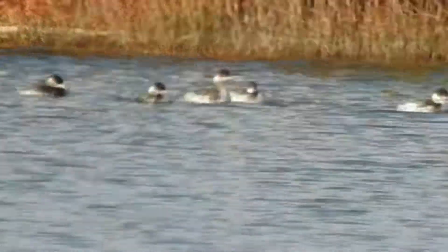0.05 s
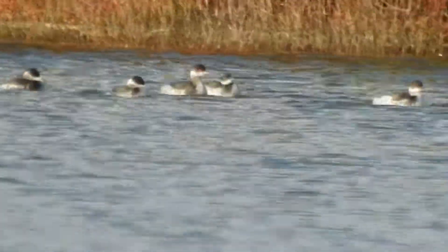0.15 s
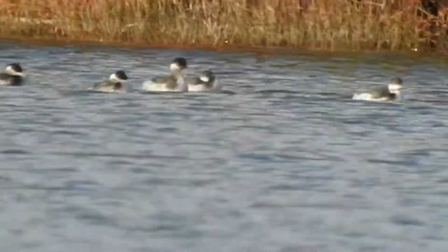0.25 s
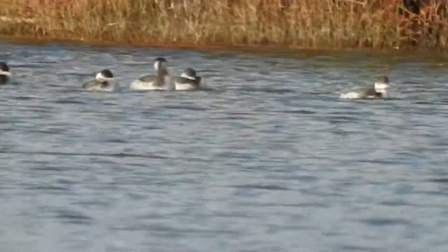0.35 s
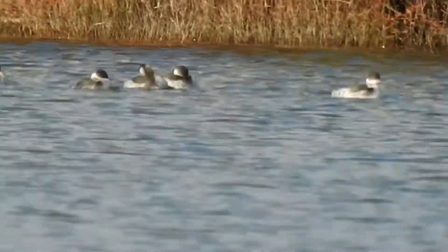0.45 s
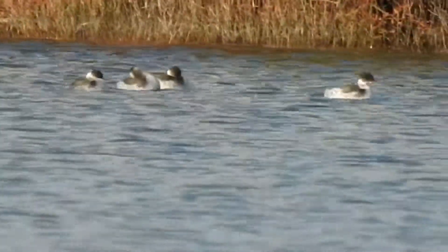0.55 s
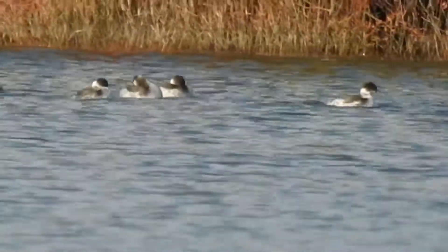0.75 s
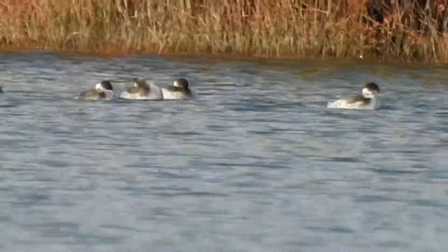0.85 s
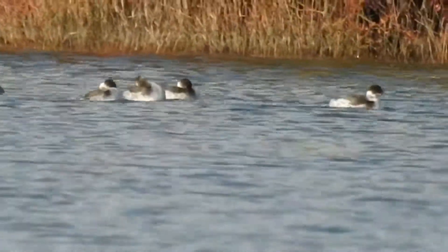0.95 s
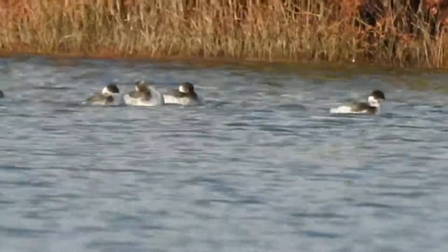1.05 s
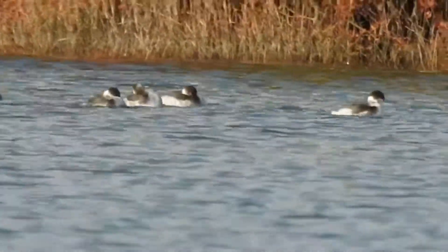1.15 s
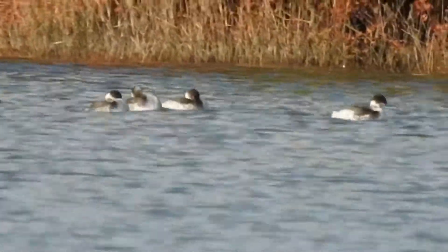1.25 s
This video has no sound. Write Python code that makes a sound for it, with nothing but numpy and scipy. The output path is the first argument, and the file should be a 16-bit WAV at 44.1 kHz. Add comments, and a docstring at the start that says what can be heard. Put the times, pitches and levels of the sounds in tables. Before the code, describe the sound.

Close to a stereo microphone, water birds give three clear whistles with a slight echo, the middle one loudest and highest. Distant peeps and chips come next, while the pond washes and bubbles quietly under a steady hiss.

```python
"""Water birds on a reedy pond

Close to a stereo microphone pair, birds whistle a warbled note, a loud high rising note with a fast
quiver, and a stepped note; the reeds and banks answer. Farther out come faint whistles, peeps and sharp
upward chips. Bubbles trickle at the water's edge and two drops plop, over low rumble, water wash and
hiss. The loudest crests overload the input and crackle faintly."""
import sys
import numpy as np
from scipy import signal
from scipy.fft import rfft, irfft, next_fast_len
from scipy.io import wavfile
from scipy.ndimage import uniform_filter1d, map_coordinates

SR = 44100
rng = np.random.default_rng(int(sys.argv[2]) if len(sys.argv) > 2 else 0)


def transcribe(u):
    """Save the signal u as a 16-bit wav file named by the first command-line argument.

    u: samples, shape (n,) or (channels, n), limited to [-1, 1]; the rate is SR.
    q: integer samples, one column per channel.
    """
    v = np.clip(np.atleast_2d(u).T, -1, 1)
    q = np.round(v * 32767).astype(np.int16)
    wavfile.write(sys.argv[1], SR, q)


N = 57330
T = np.arange(N) / SR


def amp(db):
    return 10 ** (np.asarray(db) / 20)


def unit(x):
    return x / np.sqrt(np.mean(x ** 2) + 1e-20)


def level(rows):
    """Gain per sample from rows of seconds and dB."""
    return amp(np.interp(T, *np.transpose(rows)))


def wobble(rate_hz):
    """A smooth random curve through rate_hz points a second."""
    return map_coordinates(rng.standard_normal(int(N * rate_hz / SR) + 4), [T * rate_hz])


def filtered(x, response):
    """x shaped by a response that is a function of Hz."""
    size = next_fast_len(N + 8192)
    return irfft(rfft(x, size) * response(np.fft.rfftfreq(size, 1 / SR)), size)[..., :N]


def noise_pair(length, alike):
    """White noise at the two microphones, with correlation alike."""
    common, apart = rng.standard_normal((2, length))
    angle = np.arccos(np.clip(alike, 0, 1)) / 2
    mid, side = np.cos(angle) * common, np.sin(angle) * apart
    return np.array([mid + side, mid - side])


def rush(spectrum, alike):
    """Stereo noise of rms 1, coloured by rows of Hz and dB."""
    hz, db = np.transpose(spectrum)
    colour = lambda f: amp(np.interp(np.log(f + 1), np.log(hz + 1), db))
    return unit(filtered(noise_pair(N, alike), colour))


def track(rows):
    """Smoothed pitch and gain per sample from rows of seconds, Hz and dB; silent outside them."""
    times, hz, db = np.transpose(rows)
    gain = amp(np.interp(T, times, db)) * (T >= times[0]) * (T <= times[-1])
    return uniform_filter1d(np.interp(T, times, hz), size=60), uniform_filter1d(gain, size=40)


def tone(hz, gain, order=1):
    """One partial of a whistle, gain as rms."""
    return np.sqrt(2) * gain * np.sin(2 * np.pi * order * np.cumsum(hz) / SR)


def placed(x, pan_db, lag_s):
    """The right microphone hears x louder by pan_db and sooner by lag_s than the left."""
    side = np.array([[-.5], [.5]])
    return filtered(x, lambda f: amp(pan_db * side) * np.exp(2j * np.pi * f * lag_s * side))


def echo(x, tails):
    """The diffuse answer of reeds and banks: a decaying noise tail for each row of dB and T60."""
    t = np.arange(SR) / SR
    response = 0
    for db, t60 in tails:
        unit_energy = np.sqrt(2 * np.log(1000) / t60 / SR)
        response = response + amp(db) * noise_pair(SR, alike=.7) * amp(-60 * t / t60) * unit_energy
    onset = np.clip(t / 0.0031, 0, 1)
    return signal.fftconvolve(x[None], response * onset, axes=1)[:, :N]


def near_whistles():
    """Three close, never quite steady whistles with weak overtones; the high one quivers at first."""
    # The three notes. Each row: time in seconds, pitch in Hz, level in dB.
    warble = [(0, 3384, -29.5), (.003, 3730, -35), (.009, 3364, -27), (0.018, 2924, -39.5),
              (.019, 3164, -27.5), (0.024, 3690, -34.5), (0.029, 3432, -29.5), (0.037, 2810, -35.5),
              (0.039, 3170, -30.5), (0.042, 3886, -33.5), (0.051, 3396, -27.5), (0.054, 2990, -34.5),
              (.06, 3074, -40.5), (0.0619, 3895, -27.5), (0.075, 3727, -31), (.079, 4110, -24),
              (0.083, 4037, -23), (0.088, 4084, -30.5), (0.098, 4147, -22), (.105, 4140, -28.5),
              (0.11, 4140, -57)]
    high = [(.203, 5090, -73), (0.205, 5700, -36.5), (0.21, 6050, -24), (.217, 6220, -16),
            (0.229, 6157, -13), (0.236, 6520, -16.5), (0.243, 6940, -14.5), (.252, 6940, -10.5),
            (.259, 6815, -12.5), (.262, 7240, -16.5), (0.269, 7100, -11), (0.28, 7250, -13.5),
            (.293, 7304, -11.5), (.305, 7284, -12), (0.317, 7330, -16), (0.319, 7366, -14),
            (.325, 7485, -16), (0.327, 7090, -19.5), (.334, 6146, -19.5), (.338, 5700, -72.5)]
    stepped = [(0.351, 3470, -59), (.358, 3390, -39), (0.367, 3306, -38), (0.377, 3402, -28.5),
               (.379, 3713, -29.5), (.39, 3600, -29), (.398, 3625, -32.5), (0.407, 3595, -31.5),
               (0.413, 3617, -27), (0.415, 3360, -50.5), (0.417, 3768, -35.5), (0.428, 3424, -35),
               (.431, 3530, -56), (.434, 3840, -31.5), (.44, 3750, -36), (0.449, 3470, -33.5),
               (0.451, 4010, -28), (.467, 4078, -26.5), (.48, 4121, -27), (0.482, 4297, -35.5),
               (0.487, 4360, -63)]
    # Each row, one per note: second and third partial in dB, before throat lift and treble fade.
    overtones_db = [(-43, -38), (-56, -90), (-52, -44)]
    # One entry per note: the right microphone's lead in dB, and its lead in seconds.
    pans_db = [3, 2.5, 2]
    lags_s = [1e-5, 1.2e-5, 1e-5]
    # Close reeds, near bank, far bank. Each row: echo level in dB, T60 in seconds at echo_ref_hz.
    surroundings = [(-6.5, .04), (-12.5, .28), (-30, .7)]
    quiver_depth_hz, quiver_rate_hz, quiver_crest_s, quiver_fade_s = 170, 195, .2165, .035
    throat_hz, throat_width_hz, treble_fade_hz = 5950, 700, 10800
    flutter_db, smear_hz, echo_ref_hz = 1.1, 80, 3800
    out = 0
    for note, (db2, db3), pan_db, lag_s in zip([warble, high, stepped], overtones_db, pans_db, lags_s):
        hz, gain = track(note)
        gain = gain * amp(flutter_db * wobble(rate_hz=160))
        if note is high:
            since_crest = T - quiver_crest_s
            fade = np.exp(-(np.clip(since_crest, 0, 1) / quiver_fade_s) ** 2 / 2)
            hz = hz + quiver_depth_hz * fade * np.cos(2 * np.pi * quiver_rate_hz * since_crest)
        second = amp(db2)
        if note is warble:  # a throat resonance lifts the second partial
            second = second * (1 + 28 / (1 + ((2 * hz - throat_hz) / throat_width_hz * 2) ** 4))
        third = amp(db3) * (3 * hz < SR / 2) / (1 + (3 * hz / treble_fade_hz) ** 8)
        call = lambda f: tone(f, gain) + second * tone(f, gain, order=2) + third * tone(f, gain, order=3)
        decay_scale = (echo_ref_hz / np.average(hz, weights=gain)) ** .5  # higher notes die sooner
        tails = [(db, t60 * decay_scale) for db, t60 in surroundings]
        blurred = call(hz + smear_hz * wobble(rate_hz=110))  # moving reeds blur the echo's pitch
        out = out + placed(call(hz) + echo(blurred, tails), pan_db, lag_s)
    return out


def pond_bed():
    """Low rumble nearly alike at both microphones, a wider water wash and fine, steady hiss."""
    # Colours of the three noises. Each row: frequency in Hz, relative spectral density in dB.
    rumble_colour = [(15, -59), (30, -29), (45, -7), (80, 5), (113, 0), (161, 3.5), (204, -0.5),
                     (278, -21.5), (420, -23), (550, -50.5), (920, -120)]
    wash_colour = [(150, -31), (250, -0.5), (429, -13.5), (462, -7), (517, -11), (648, -8.5), (833, -7),
                   (5000, -24.5), (6500, -74.5), (11000, -120)]
    hiss_colour = [(1500, -32), (2500, -13.5), (4000, -7), (6000, -8), (8000, -12), (10000, -17.5),
                   (12500, -20.5), (15000, -23), (16500, -26)]
    # Swells of rumble and wash. Each row: time in seconds, level in dB (the wash before its boost).
    rumble_levels = [(0.02, -44.5), (0.076, -49), (0.286, -46.5), (0.304, -52), (0.49, -44.5),
                     (0.536, -49.5), (0.854, -51.5), (0.918, -54), (0.936, -51.5), (1.21, -52),
                     (1.252, -46), (1.3, -55)]
    wash_levels = [(0.02, -60.5), (0.268, -63.5), (0.628, -59.5), (0.742, -58.5), (1.164, -60),
                   (1.3, -61.5)]
    wash_boost_db, hiss_db = 4.0, -58.5
    rumble = level(rumble_levels) * rush(rumble_colour, alike=0.97)
    wash = amp(wash_boost_db) * level(wash_levels) * rush(wash_colour, alike=0.59)
    hiss = amp(hiss_db) * rush(hiss_colour, alike=0.25)
    return rumble + wash + hiss


def trickle(count=1200):
    """Small bubbles at the water's edge ring with rising pitch, scattered from left to right."""
    # Strength of the trickle. Each row: time in seconds, level in dB.
    levels = [(0, -75.5), (.2, -62), (.45, -64), (.56, -89.5), (.58, -55.5), (.68, -56.5), (.76, -61),
              (.95, -65), (1.02, -68.5), (1.3, -63.5)]
    median_hz, log_spread, ring_cycles, rise, samples = 2000, .3, 6, .2, 800
    when, size, pan = np.hsplit(rng.random((count, 3)), 3)
    hz = median_hz * np.exp(log_spread * rng.standard_normal((count, 1)))
    age = np.arange(samples) / SR * hz / ring_cycles
    envelope = amp(-1.8 * np.log(size)) * age * np.exp(-3 * age)  # a few bubbles stand out
    bubbles = envelope * np.sin(2 * np.pi * ring_cycles * (age + rise * age * age / 2))
    at = ((when * N).astype(int) + np.arange(samples)).ravel()
    sides = np.cos(pan * np.pi / 2), np.sin(pan * np.pi / 2)
    stereo = [np.bincount(at, (bubbles * side).ravel(), N + samples)[:N] for side in sides]
    return level(levels) * unit(np.array(stereo))


def far_calls():
    """Peeps and whistles from across the pond, wavering and deep in echoes."""
    # Faint peeps. Each row: start in seconds, length in seconds, pitch in Hz, top level in dB.
    peeps = [(0, .012, 5800, -49), (.618, .03, 4520, -63), (.676, .02, 4500, -56), (.678, .026, 5850, -64),
             (.778, .013, 4560, -56), (.836, .026, 3430, -62), (.84, .03, 5720, -62),
             (.843, .012, 4480, -61), (.846, .032, 7250, -65)]
    # Two whistles, a list for each. Each row: time in seconds, pitch in Hz, level in dB.
    whistles = [
        [(1.038, 5200, -67.5), (1.045, 4400, -58), (1.056, 2900, -61), (1.068, 2080, -62.5),
         (1.087, 2580, -55.5), (1.11, 2640, -62.5), (1.135, 2600, -68.5)],
        [(1.205, 3750, -66), (1.215, 3680, -65), (1.25, 3520, -61), (1.268, 3300, -58.5), (1.285, 3700, -60),
         (1.3, 4200, -65)],
    ]
    # The banks' answer. Each row: level in dB, T60 in seconds.
    tails = [(0.5, 0.067), (-9.5, .5)]
    scoop, scoop_s = .08, .006  # a peep slides up to its pitch from this fraction below
    waver_hz, flutter_db = 40, 2.2
    scooped = [[(start, hz * (1 - scoop), db - 6), (start + scoop_s, hz, db),
                (start + length, hz, db - 6)] for start, length, hz, db in peeps]
    out = 0
    for hz, gain in map(track, whistles + scooped):
        call = tone(hz + waver_hz * wobble(rate_hz=120), gain * amp(flutter_db * wobble(rate_hz=90)))
        out = out + call + echo(call, tails)
    return out


def chips():
    """Sharp upward chips of farther birds; the reeds return mostly the top of each sweep."""
    # The three chips. Each row: start in seconds, base level in dB.
    starts = [(1.0233, -40), (1.1605, -36.5), (1.2368, -36.5)]
    # One chip's sweep. Each row: seconds from its start, pitch in Hz, dB added to the base level.
    sweep = [(0, 4200, -34), (.002, 4900, 2.5), (.005, 6000, 4.5), (.008, 7000, 6.5), (.011, 7700, -14.5)]
    # The reeds' answer. Each row: level in dB before the treble lift, T60 in seconds.
    tails = [(-4.5, 0.07), (-3.5, 0.49)]
    highpass_hz, treble_lift_db = 6740, 3
    out = 0
    for start, base_db in starts:
        chip = tone(*track([(start + t, hz, base_db + db) for t, hz, db in sweep]))
        bright = filtered(chip, lambda f: amp(treble_lift_db) / (1 + (highpass_hz / (f + 1)) ** 4))
        out = out + chip + echo(bright, tails)
    return placed(out, pan_db=0, lag_s=-5.8e-5)  # the left microphone hears them first


def plops():
    """Two drops land on the water, each a low, quickly damped ring."""
    # Each row: start in seconds, pitch in Hz, level in dB from which the decay starts.
    drops = [(1.163, 474, -35), (1.231, 790, -32.5)]
    attack_s, t60_s = 0.0005, 0.012
    out = 0
    for start, hz, db in drops:
        age = np.clip(T - start, 0, 1)
        envelope = amp(db - 60 * age / t60_s) * (1 - np.exp(-age / attack_s))
        out = out + envelope * np.sin(2 * np.pi * hz * age)
    return out


def scene():
    """Birds and water as they reach the microphone pair."""
    return near_whistles() + far_calls() + chips() + plops() + trickle() + pond_bed()


def record(dry):
    """The overloaded input crackles faintly on the loudest crests; nothing passes the band limit."""
    crackle_db, overload_level, steepness, band_limit_hz = -57, .62, 5, 15800
    crest = np.abs(signal.hilbert(dry)) / overload_level
    crackle = amp(crackle_db) * np.clip(crest, 0, 1) ** steepness * rng.standard_normal(N)
    return filtered(dry + crackle, lambda hz: hz < band_limit_hz)


dry = scene()
out = record(dry)
transcribe(out)
```